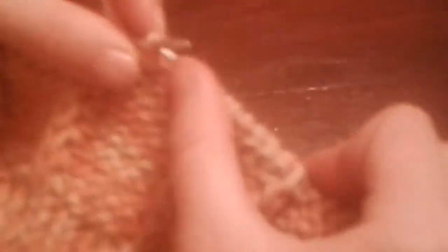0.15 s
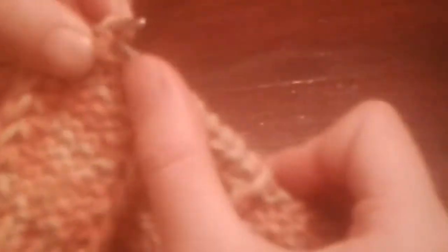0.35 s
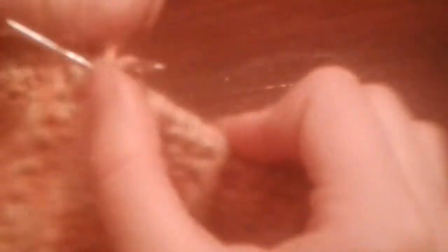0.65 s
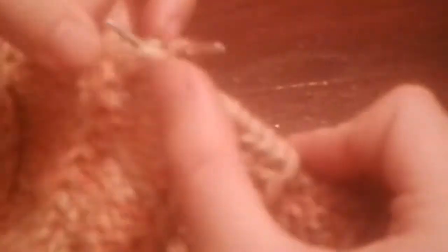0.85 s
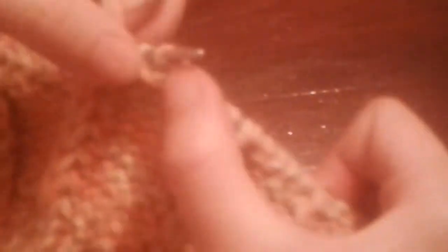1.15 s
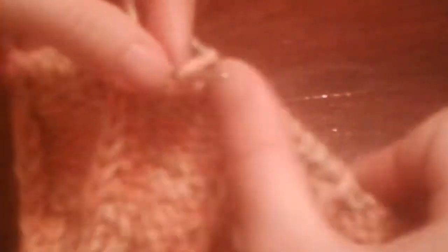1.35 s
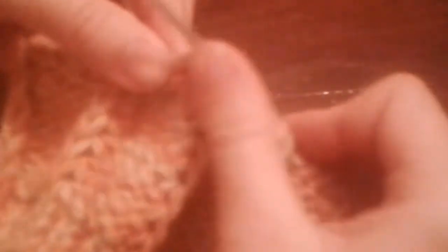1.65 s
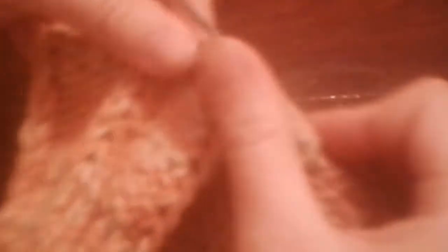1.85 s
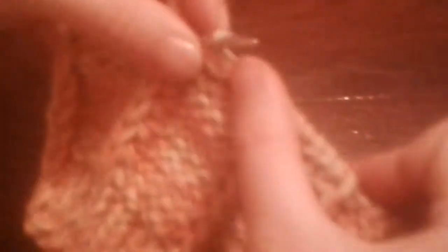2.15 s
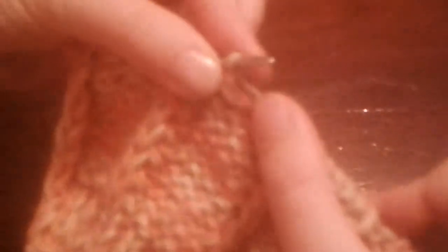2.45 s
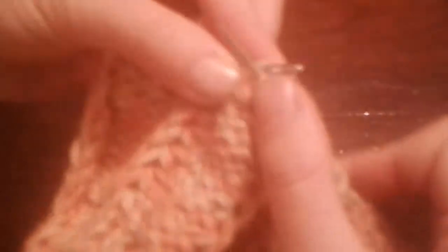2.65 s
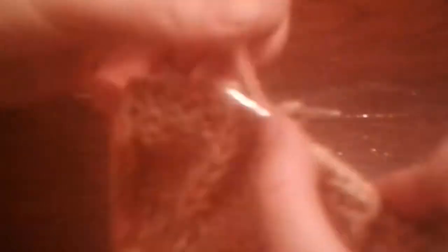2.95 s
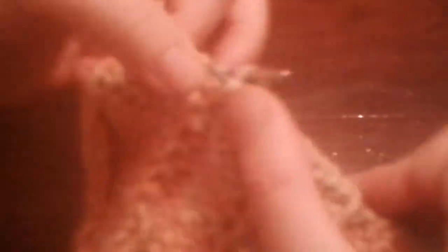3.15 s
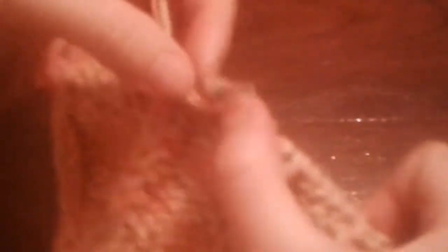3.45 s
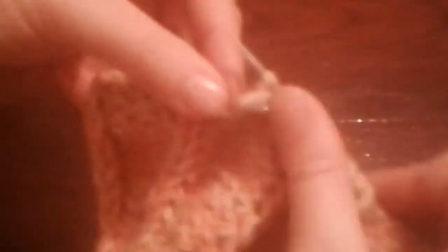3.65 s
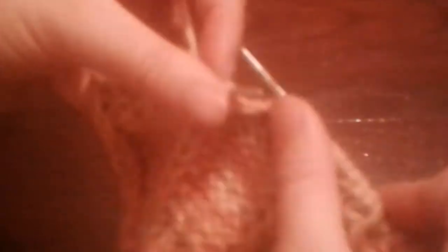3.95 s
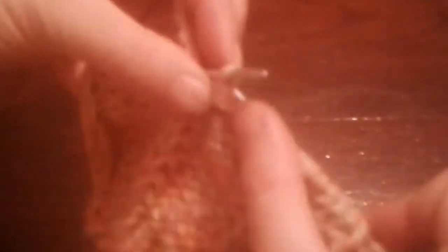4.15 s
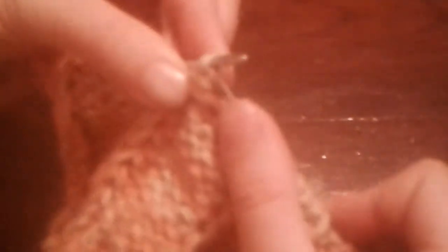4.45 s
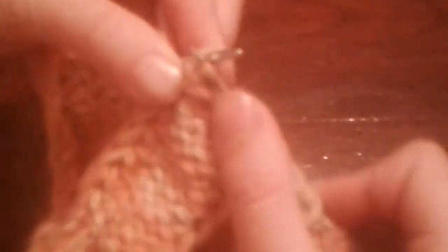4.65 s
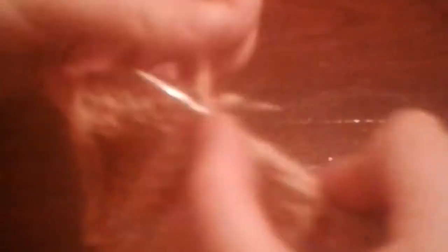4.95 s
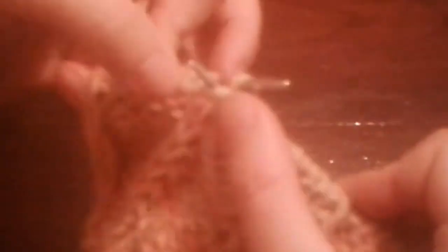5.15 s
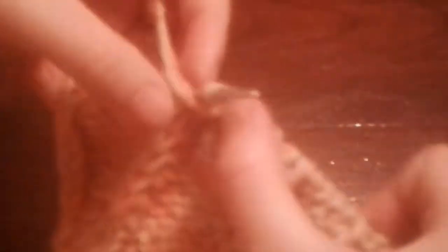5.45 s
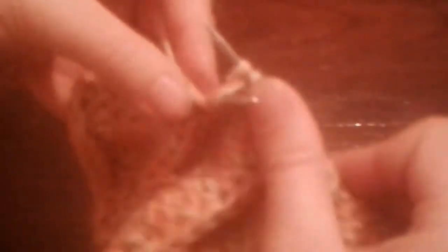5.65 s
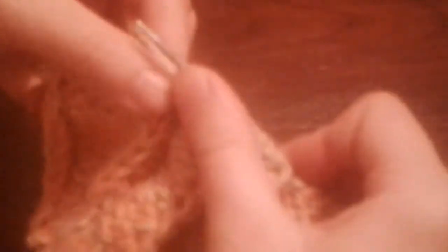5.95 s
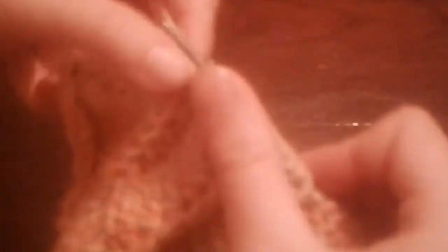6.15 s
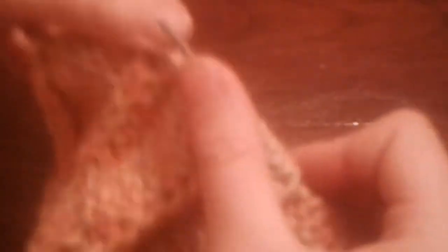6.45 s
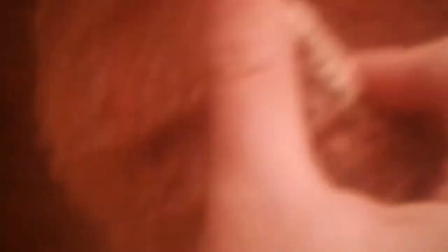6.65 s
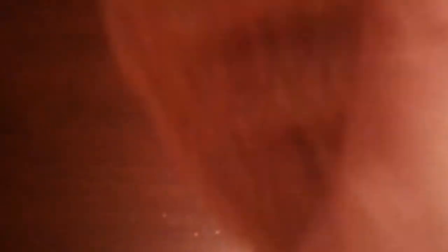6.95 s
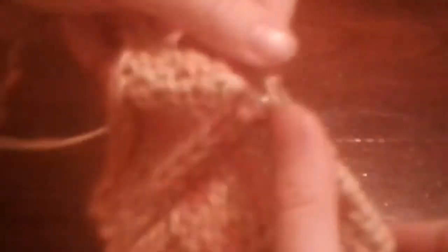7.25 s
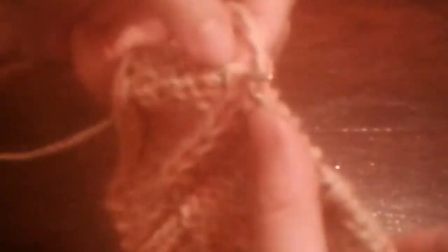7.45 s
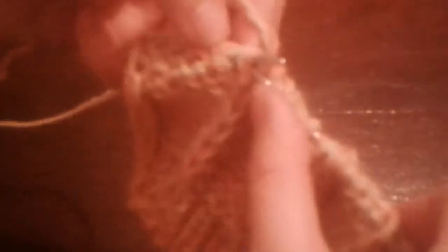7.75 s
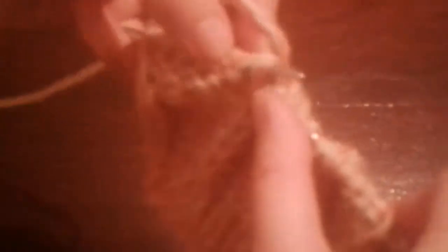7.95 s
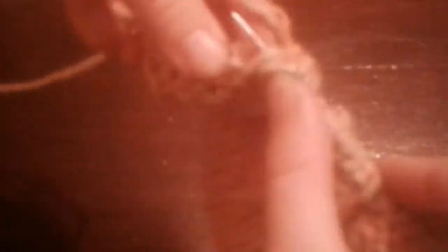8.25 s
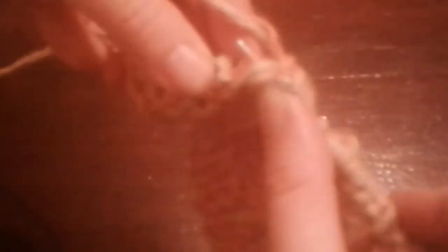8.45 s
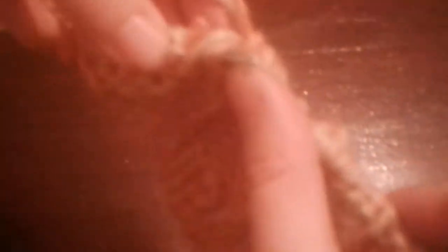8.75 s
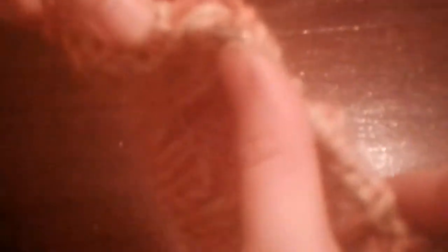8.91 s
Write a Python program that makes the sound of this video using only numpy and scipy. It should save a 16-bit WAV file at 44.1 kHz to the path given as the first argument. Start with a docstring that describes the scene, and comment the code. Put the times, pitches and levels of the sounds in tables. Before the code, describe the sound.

A small quiet room, heard close and centred, with faint low rumble, wavering hum and soft hiss that settles within the first second. Metal knitting needles tick at 0.2 s, tap wood at 0.4 s, and scrape briefly at 0.5-0.7 s. Soft hand thuds fall near 0.8, 1.0 and 1.4 s, with light knocks at 1.1 and, clearer, 1.6 s. Yarn rustles faintly. A small cluster of knocks and scrapes comes at 2.4-2.9 s, another tap at 3.2 s. At 4.06 s a hard rap clatters, by far the loudest event, then quick woody knocks run from 4.3 to 5 s. A faint low drone swells around 5.6 s; a strong knock lands at 5.8 s. At 6.3 s a knock starts scraping, becoming a long drag until 6.9 s with a low groan and bright yarn swish. Sparse ticks and a tap follow from 7.6 s, a strong crisp tick at 8.3 s, and a faint metallic slide at 8.8 s.

```python
"""Knitting with metal needles just above a wooden table in a small quiet room.
It opens on hum, rumble and a hiss that soon settles; yarn rustles, tips tick, and a needle end taps the wood.
Knocks and scrapes ring the table as damped modes; near 4 s a hard rap clatters, then a quick run of knocks follows.
A low drone swells, then a long drag groans under a bright swish of yarn, all shaped from noise and sines.
Sparser knocks, slides and rustles follow, and a last, strong tick of the tips comes near the end."""
import sys
import numpy as np
from scipy import signal
from scipy.fft import rfft, irfft, next_fast_len
from scipy.io import wavfile

SR = 44100
rng = np.random.default_rng(int(sys.argv[2]) if len(sys.argv) > 2 else 0)


def bounce(signal):
    """Save signal as a 16-bit WAV file at the path given by the first command-line argument."""
    frames = np.transpose(np.atleast_2d(signal))
    limited = np.clip(frames, -1, 1)
    pcm = np.round(limited * 32767).astype(np.int16)
    wavfile.write(sys.argv[1], SR, pcm)


N = 400416
SHOT = np.arange(2 ** 14) / SR   # time axis of one short sound, in seconds

# Spectrum of slow wavering. Each row: frequency in Hz, density in dB per Hz.
WAVER_COLOUR = [(3, -2), (8, -14), (30, -61), (100, -120)]


def from_db(db):
    """Decibels to gain."""
    return 10 ** (np.asarray(db) / 20)


def unit(x):
    """Scale to energy 1."""
    return x / np.sqrt(np.sum(x ** 2) + 1e-20)


def at_hz(points, hz):
    """Read a table on a log-frequency axis."""
    table = np.array(points)
    return np.interp(np.log(hz + 1e-3), np.log(table[:, 0]), table[:, 1])


def add(track, s, sound):
    """Mix a sound in at time s."""
    start = int(s * SR)
    track[start:start + len(sound)] += sound[:N - start]


def swell(peak_s, half_s):
    """A smooth (Gaussian) rise and fall of height 1."""
    return np.exp(-((np.arange(N) / SR - peak_s) / half_s) ** 2 / 2)


def coloured(x, points):
    """Causal (minimum-phase) filter with the given dB curve."""
    curve_db = at_hz(points, np.fft.rfftfreq(len(x), 1 / SR))
    cepstrum = irfft(np.log(from_db(curve_db)))
    # folding the cepstrum forward makes the filter minimum-phase
    cepstrum[1:len(x) // 2] *= 2
    cepstrum[len(x) // 2 + 1:] = 0
    return irfft(rfft(x) * np.exp(rfft(cepstrum)))


def noise(points):
    """Steady noise of a given colour, rms 1."""
    size = next_fast_len(N, True)
    gain = from_db(at_hz(points, np.fft.rfftfreq(size, 1 / SR)))
    white = rfft(rng.standard_normal(size))
    return unit(irfft(white * gain)[:N]) * np.sqrt(N)


def chatter(envelope, count=5):
    """Random micro-impacts under an envelope, holding all pitches about equally."""
    force = rng.standard_normal(len(SHOT)) * envelope
    for _ in range(count):
        # flatten the spectrum, then shape in time again
        flat = irfft(np.exp(1j * np.angle(rfft(force))))
        force = flat * np.sqrt(envelope)
    return unit(force)


def reverberation(build_s, t60s):
    """Diffuse sound: it builds up, then each band dies at its own rate."""
    white = rfft(rng.standard_normal(len(SHOT)))
    hz = np.fft.rfftfreq(len(SHOT), 1 / SR)
    edges = np.geomspace(60, 18000, 24)
    out = 0
    for low, high in zip(edges, edges[1:]):
        t60 = at_hz(t60s, np.sqrt(low * high))
        decay = from_db(-60 * SHOT / t60) * (1 - np.exp(-SHOT / build_s))
        band = irfft(white * (hz >= low) * (hz < high))
        out = out + unit(band * decay) * np.sqrt(high - low)
    return unit(out)


def in_room(x, wet_db, gap_s=0.0):
    """A close sound plus its duller reflections, delayed by gap_s."""
    # Decay of the small room. Each row: frequency in Hz, t60 in seconds.
    room_t60 = [(150, 0.28), (500, 0.22), (1200, 0.23), (2200, 0.21), (4000, .18), (8000, 0.154),
                (15000, 0.17)]
    walls = coloured(reverberation(build_s=0.0012, t60s=room_t60),
                     [(300, 0.5), (2000, 3.5), (4500, -0.5), (7500, -4.5), (12000, -0.5)])
    out = x.copy()
    add(out, gap_s, from_db(wet_db) * signal.fftconvolve(x, walls))
    return out


def mode_shapes(modes):
    """One decaying sine per mode, wider modes dying faster, with alternating signs."""
    shapes = []
    for k, (hz, width, db) in enumerate(modes):
        decay = width * np.exp(-np.pi * width * SHOT)
        shapes.append((-1) ** k * from_db(db) * decay * np.cos(2 * np.pi * hz * SHOT))
    return np.array(shapes)


def struck(shapes, spread_db):
    """Each point of contact feeds the modes in different shares."""
    shares = from_db(rng.normal(0, spread_db, len(shapes)))
    return unit(shares @ shapes)


def contact(envelope, bass_db, treble_db, ring_hz, ring_db, reach=1.31):
    """Force of one touch: weight brings bass, hardness treble, and the grip favours one bending resonance."""
    tone = [(300, 0.97 * bass_db), (650, 0.75 * bass_db - 1.5), (980, 0.89 * bass_db + 0.3),
            (1400, 0), (3800, 0), (7500, treble_db)]
    resonance = [(ring_hz / reach, 0), (ring_hz, ring_db), (ring_hz * reach, 0)]
    return coloured(coloured(chatter(envelope), tone), resonance)


def needle_on_table(touches, envelope, needle_db, table_db, room_db):
    """At each touch the needle gives a short clack and the table top rings on."""
    # Modes of the needle, damped by the hand. Each row: frequency in Hz, width in Hz, spectral level in dB.
    needle_modes = [(410, 157, -9), (1004, 170, -4), (1940, 176, -0.5), (2326, 180, -1), (2806, 304, -1.5),
                    (3318, 236, -4), (3826, 270, -4), (4450, 240, -5.5), (5030, 420, -8.5),
                    (6260, 800, -12), (7580, 480, -8.5), (8370, 300, -11.5), (8780, 460, -16.5)]
    # Modes of the table top. Each row: frequency in Hz, width in Hz, spectral level in dB.
    table_modes = [(267.8, 13.6, 0.5), (410, 8.8, 4.5), (602, 11, -22), (679, 52, -5), (744, 12.5, -5),
                   (967, 10.2, 3), (999, 17, 0.5), (1234, 11.5, 2.5), (1520, 24, -1), (1552, 29, -3),
                   (1630, 16, -3), (1896, 24, -5), (1937, 36, -3.5), (2120, 18, -9.5), (2320, 13, 2),
                   (2415, 22, -11), (2724, 10.6, -0.5), (2900, 14, -16), (3255, 21, -1), (3753, 23, -5.5)]
    out, needle, table = np.zeros(N), mode_shapes(needle_modes), mode_shapes(table_modes)
    for s, level_db, bass_db, treble_db, length, ring_hz, ring_db in touches:
        force = contact(envelope(SHOT / length), bass_db, treble_db, ring_hz, ring_db)
        clack = from_db(needle_db) * struck(needle, spread_db=1.5)
        wood = from_db(table_db) * struck(table, spread_db=2.5)
        body = coloured(clack + wood, [(100, -14.5), (250, -1), (9000, -0.5),
                                       (10200, -5.5), (12000, -16), (16000, -7)])
        add(out, s, from_db(level_db) * signal.fftconvolve(force, body))
    return in_room(out, room_db)


def knocks():
    """The needle lands and chatters for a few milliseconds, now and then longer."""
    # Landings on the wood. Each row: start in seconds, relative level in dB, bass in dB, treble in dB,
    # chatter decay in seconds, favoured resonance in Hz, its lift in dB.
    landings = [(0.357, -21, 2.5, 6, 0.0044, 3700, 4), (1.079, -21, -0.5, 5.5, 0.0034, 2800, 2),
                (1.5572, -12, 0.5, 2, 0.0018, 4440, 2.5), (2.4242, -29.5, -1, -3.5, 0.0044, 1910.0, 3),
                (2.5087, -17, 1.2, -7, 0.0039, 2870.0, 0), (2.6402, -18, -3, -6.5, 0.02, 4900.0, 4),
                (2.804, -30.5, 2, -12, 0.018, 2300, 0), (3.246, -17.5, -1.4, -5, 0.0035, 2050, 2),
                (4.2753, -10, 4, -9.5, 0.0051, 1850, 7), (4.4334, -14, -8, 6.5, 0.0053, 4930.0, -2.5),
                (4.5182, -8, 1.5, -5, 0.016, 1990, 6.5), (4.686, -18, -6.5, 3.5, 0.0077, 4850, 4),
                (4.9506, -16, 3, -6, 0.0088, 1880.0, 2), (5.8413, -9.5, 9, 8, 0.0027, 1840, 7),
                (6.3074, -15, 11.5, 7, 0.0047, 4100, 13), (7.614, -20, 0.5, 2, 0.0036, 4530, 3.5)]
    return needle_on_table(landings, lambda u: np.exp(-u ** 2), needle_db=0.5, table_db=-5.0, room_db=-5.5)


def scrapes(catches_per_s=90, catch_db=1.25):
    """Friction swells and fades, catching unevenly as the needle end slides over the grain."""
    # Drags over the wood. Each row: start in seconds, relative level in dB, bass in dB, treble in dB,
    # length in seconds, favoured resonance in Hz, its lift in dB.
    drags = [(0.51, -27, 5, -3, 0.034, 2100, 4), (0.663, -22, 4, -6, 0.037, 1490, 2),
             (2.704, -17.5, -2, -4.5, 0.032, 1900, 1), (2.845, -25.5, 4.5, -4, 0.042, 2400, 1.5),
             (3.321, -36, 1, 1, 0.071, 2790, 11), (3.396, -34.5, 9, -3, 0.017, 1780, 12.5),
             (4.384, -24, 6.5, -8, 0.014, 2020, 15), (4.513, -13.5, -1, 2, 0.0084, 1830, 4),
             (4.79, -32.5, 4, -1, 0.021, 2270, 6), (4.899, -23, 3, -9, 0.029, 2390, 2),
             (6.315, -16, 9, -2.5, 0.046, 3890, 1), (6.355, -16, 10, -3, 0.016, 3830, 5),
             (6.52, -19.5, 8.5, 7.5, 0.37, 3920, 2.5)]

    def stroke(u):
        grain = rng.standard_normal(len(SHOT))
        catches = np.interp(SHOT * catches_per_s, np.arange(len(SHOT)), grain)
        return np.sqrt(np.maximum(u * (1 - u), 0)) * from_db(catch_db * catches)
    return needle_on_table(drags, stroke, needle_db=-1.5, table_db=-5.5, room_db=-5.5)


def groan(peak_s=6.714, half_s=0.043, hz=259, level_db=-47):
    """During the longest drag the friction locks on near the table's lowest mode: a swelling sine."""
    return from_db(level_db) * swell(peak_s, half_s) * np.sin(2 * np.pi * hz * np.arange(N) / SR)


def rap(hit_s=4.0595, swing_s=0.00014, pulse_db=-11.5, clatter_db=6.0, ring_db=-1.5, crack_db=-7.5):
    """One hard blow: a single pressure swing with a bright crack, then a dense clatter and lingering modes."""
    # Decay of the clatter. Each row: frequency in Hz, t60 in seconds.
    clatter_t60 = [(150, 0.5), (500, 0.28), (1300, 0.3), (3000, 0.25), (6000, 0.22), (15000, .15)]
    # Colour of the clatter. Each row: frequency in Hz, gain in dB.
    clatter_colour = [(40, -35), (85, -9.5), (190, -5.5), (260, -12.5), (500, -3.5), (700, -10), (1100, -1),
                      (1900, -4.5), (2700, -12), (5500, -9.5), (6800, -22.5), (8200, -19.5), (11000, -40.5),
                      (15000, -41)]
    # Lingering modes. Each row: frequency in Hz, relative level in dB, t60 in seconds.
    ring_modes = [(201.4, -3, 0.21), (464, -10, 0.27), (573, -2, 0.16), (855, -7, 0.29), (894, -7, 0.23),
                  (950, -9, 0.34), (1166, -2, 0.237), (1255, -15, .28), (1390, -5, 0.2), (1723, -14, .24),
                  (1970, -7, .2)]
    u = (SHOT - .0009) / swing_s
    pulse = -u * np.exp((1 - u ** 2) / 2)
    crack = coloured(chatter(np.exp(-SHOT / 0.0038)), [(60, -35), (800, -20.0), (3000, -1.5),
                                                      (5500, -2.0), (8500, -5), (11000, -23.0)])
    clatter = reverberation(build_s=.0012, t60s=clatter_t60)
    clatter = coloured(clatter * (1 + np.exp(-SHOT / 0.025)), clatter_colour)   # denser at first
    ring = np.zeros(len(SHOT))
    for hz, db, t60 in ring_modes:
        sign = rng.choice([-1, 1])
        ring += sign * from_db(db - 60 * SHOT / t60) * np.sin(2 * np.pi * hz * SHOT)
    burst = from_db(crack_db) * unit(crack)
    burst += from_db(clatter_db) * unit(clatter)
    burst += from_db(ring_db) * unit(ring)
    out = np.zeros(N)
    add(out, hit_s - .0004, from_db(pulse_db) * pulse)
    add(out, hit_s + 0.00043, burst)
    return out


def ticks(t60=0.0066, bounce_s=0.0018, bounce_db=-5):
    """Tip on tip: a tiny dry click, with its reflection from the table just behind."""
    # Meetings of the tips. Each row: start in seconds, level in dB before a shared 4.5 dB lift,
    # bass in dB before a shared 11 dB lift.
    meetings = [(0.2258, -34, -13.5), (1.2615, -48, -12), (1.453, -50, -1), (2.2109, -43, -7),
                (2.259, -42, 5.5), (3.4952, -46, -11), (4.2078, -34.5, -11), (5.7911, -42.5, -10),
                (7.583, -45, -8), (8.025, -40.5, -26), (8.164, -48.5, -16), (8.23, -47, -10),
                (8.3065, -23, -3)]
    # Colour of a click. Each row: frequency in Hz, gain in dB.
    tip_colour = [(200, -14.5), (1000, -5), (3000, -13.5), (6000, -5.5), (8200, 2), (9500, -5.5),
                  (11500, -23), (15000, -10.5)]
    out, decay = np.zeros(N), from_db(-60 * SHOT / t60)
    for s, level_db, bass_db in meetings:
        click = unit(coloured(chatter(decay), tip_colour))
        click = from_db(level_db + 4.5) * coloured(click, [(3000, bass_db + 11), (7000, 0)])
        add(out, s, click)
        add(out, s + bounce_s, from_db(bounce_db) * click)
    return in_room(out, wet_db=-11, gap_s=0.007)


def slides():
    """Shaft slides along shaft as a stitch is taken: a faint, high rasp."""
    # Shaft along shaft. Each row: start in seconds, relative level in dB, length in seconds.
    strokes = [(0.798, -38, .05), (1.80, -35, 0.053), (3.796, -33.5, 0.063), (5.798, -34, 0.04),
               (7.802, -35.5, 0.022), (7.824, -41.5, 0.034), (8.778, -35.5, 0.096)]
    # Modes of the sliding shafts. Each row: frequency in Hz, width in Hz, spectral level in dB.
    shaft_modes = [(2385, 240, -1.5), (3100, 300, -9.5), (4120, 250, 1), (4700, 350, -4.5),
                   (5380, 400, -3.5), (8400, 900, -14)]
    out, shafts = np.zeros(N), mode_shapes(shaft_modes)
    for s, level_db, length in strokes:
        stroke = np.maximum(np.sin(np.pi * np.minimum(SHOT / length, 1)), 0) ** .5
        rasp = signal.fftconvolve(chatter(stroke), struck(shafts, spread_db=2.0))
        add(out, s, from_db(level_db) * rasp)
    return in_room(out, wet_db=-1.5)


def bumps():
    """The hands nudge the table: soft, low thuds."""
    # Hands against the table. Each row: start in seconds, level in dB.
    nudges = [(.843, -33), (.978, -31.5), (1.373, -34)]
    out = np.zeros(N)
    for s, level_db in nudges:
        thud = coloured(chatter(np.exp(-SHOT / 0.016)), [(50, -20), (110, -1), (190, 2),
                                                        (300, -13), (1000, -34), (4000, -55)])
        add(out, s, from_db(level_db) * unit(thud))
    return out


def yarn_pull(peak_s=6.672, half_s=0.031, level_db=-55.5):
    """A length of yarn is drawn past with a short bright swish of noise."""
    rise_and_fall = 1 / (1 + ((np.arange(N) / SR - peak_s) / half_s) ** 2)
    swish = noise([(1000, -5), (6000, -7), (8300, 2), (11500, -16), (15000, -11)])
    return from_db(level_db) * rise_and_fall * swish


def yarn(half_s=0.1, rest_db=-85, flutter_db=2.5):
    """Yarn rustles along the metal, unevenly, louder with each push of the fingers."""
    # Yarn pushed along a needle. Each row: peak in seconds, level in dB added on top of the resting rustle.
    pushes = [(0.2, -79), (0.68, -81.5), (1.4, -81.5), (1.85, -84), (2.72, -76.5), (3.33, -85), (3.78, -79),
              (4.3, -80), (4.96, -77), (5.39, -82.5), (5.8, -77), (8.25, -79)]
    # Colour of the rustle. Each row: frequency in Hz, density in dB per Hz.
    yarn_colour = [(1500, -23), (4000, -5), (6500, -3.5), (8300, 4.5), (9300, -5.5), (10500, -15.5),
                   (16000, -20)]
    effort = from_db(rest_db) + sum(from_db(db) * swell(s, half_s) for s, db in pushes)
    flutter = from_db(flutter_db * noise(WAVER_COLOUR))
    return effort * flutter * noise(yarn_colour)


def rumble(level_db=-68.5, fall_db_per_s=0.24):
    """Low room noise that sinks slowly."""
    # Colour of the rumble. Each row: frequency in Hz, density in dB per Hz.
    rumble_colour = [(10, -36.5), (28, -23), (42, -5.5), (62, -13), (88, 0.5), (115, -4.5), (150, -0.5),
                     (200, -4), (260, -9), (400, -28), (1000, -46)]
    t = np.arange(N) / SR
    return from_db(level_db - fall_db_per_s * t) * noise(rumble_colour)


def hum():
    """Steady low tones whose level and phase waver."""
    # Tones of the hum. Each row: frequency in Hz, mean level in dB.
    tones = [(88, -78), (140, -82.5), (199, -76)]
    t, out = np.arange(N) / SR, np.zeros(N)
    for hz, db in tones:
        strength = from_db(db) * (1 + .5 * noise(WAVER_COLOUR))
        out += strength * np.sin(2 * np.pi * hz * t + .8 * noise(WAVER_COLOUR))
    return out


def drone(peak_s=5.58, half_s=0.21, hz=101, level_db=-63.5):
    """A low tone of wavering phase swells once."""
    phase = 2 * np.pi * hz * np.arange(N) / SR + .7 * noise(WAVER_COLOUR)
    return from_db(level_db) * swell(peak_s, half_s) * np.sin(phase)


def hiss(level_db=-68.5, extra_db=4, settle_s=0.82):
    """Soft broad noise that starts a little louder and settles."""
    # Colour of the hiss. Each row: frequency in Hz, density in dB per Hz.
    hiss_colour = [(150, -40), (250, -4), (373, -3), (468, -5), (1240, -10), (1350, -9), (1470, -10),
                   (1820, -9.5), (5350, -18.5), (7980, -24), (10400, -30.5), (14900, -23.5), (16000, -23.5)]
    t = np.arange(N) / SR
    return from_db(level_db + extra_db * np.exp(-(t / settle_s) ** 2)) * noise(hiss_colour)


def scene():
    """Everything is heard in the centre; only a trace of noise differs between the ears."""
    needles = knocks() + scrapes() + groan() + rap() + ticks() + slides()
    hands_and_yarn = bumps() + yarn_pull() + yarn()
    background = rumble() + hum() + drone() + hiss()
    width = from_db(-76.5) * noise([(30, -9.5), (120, 8), (1000, 7), (6000, -3), (11000, -10.0), (15000, -5)])
    # opposite signs left and right
    return needles + hands_and_yarn + background + width * np.array([[1], [-1]])


def record(dry, cutoff_hz=15900):
    """A steep elliptic low-pass cuts the top."""
    return signal.sosfilt(signal.ellip(10, .1, 70, cutoff_hz, fs=SR, output="sos"), dry)


dry = scene()
out = record(dry)
bounce(out)
```